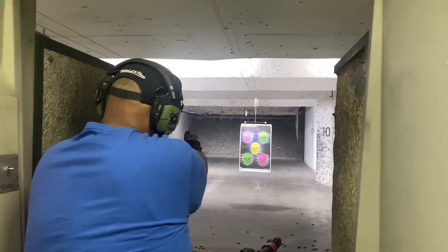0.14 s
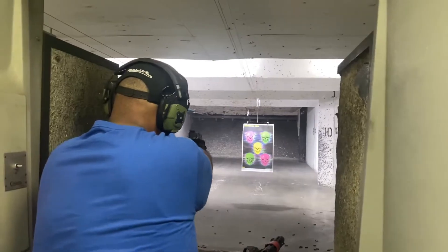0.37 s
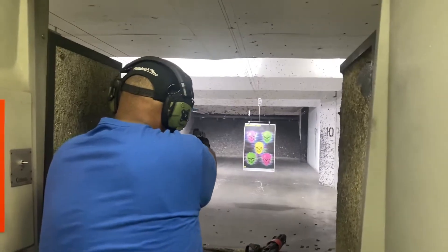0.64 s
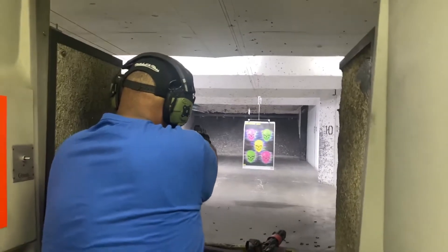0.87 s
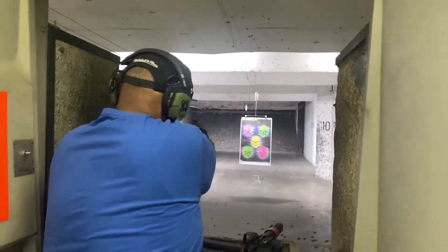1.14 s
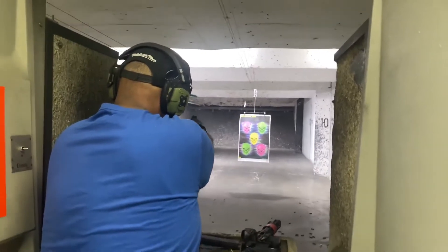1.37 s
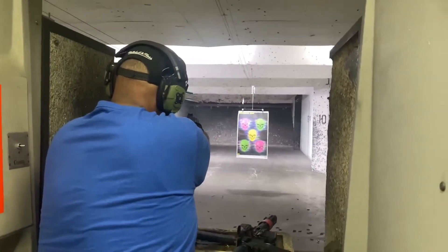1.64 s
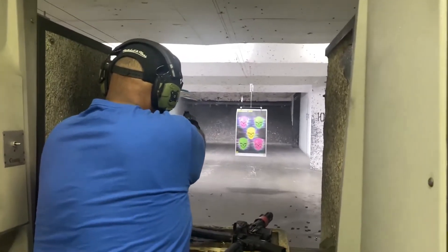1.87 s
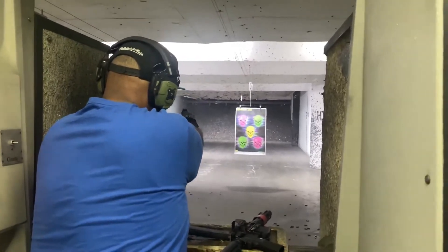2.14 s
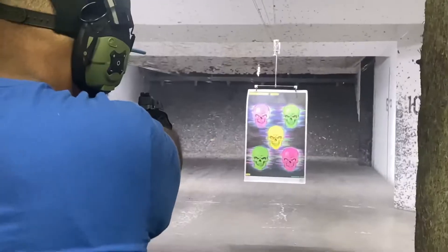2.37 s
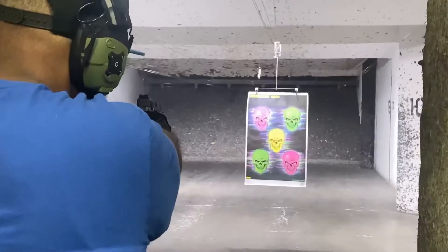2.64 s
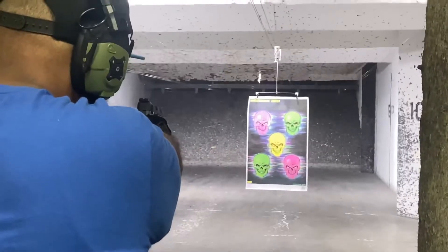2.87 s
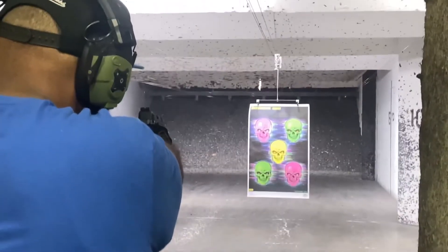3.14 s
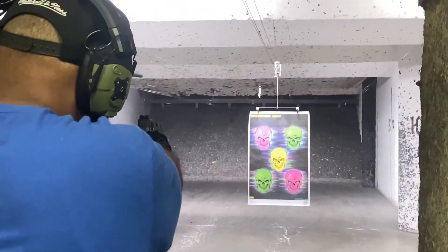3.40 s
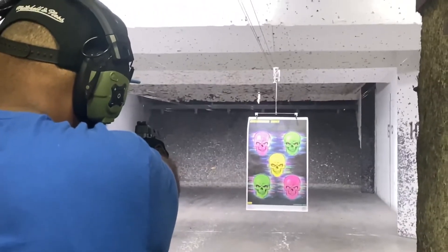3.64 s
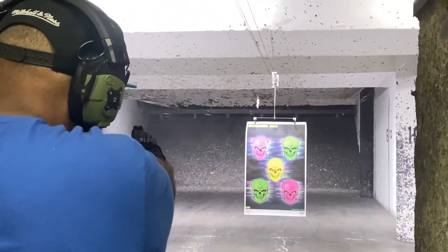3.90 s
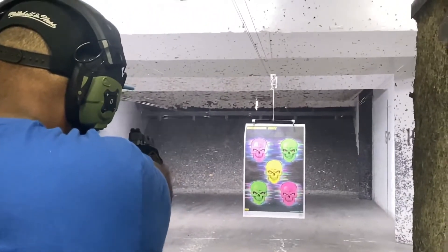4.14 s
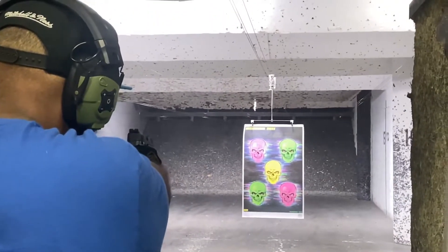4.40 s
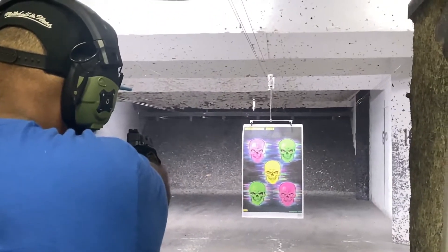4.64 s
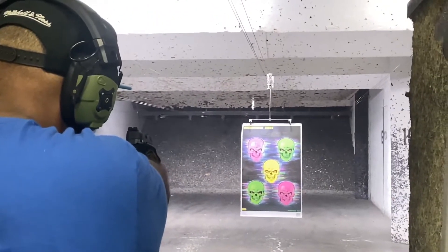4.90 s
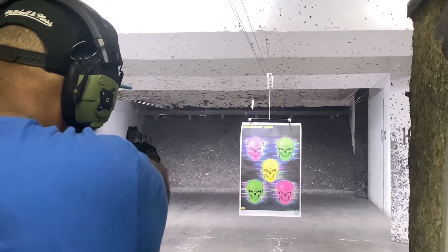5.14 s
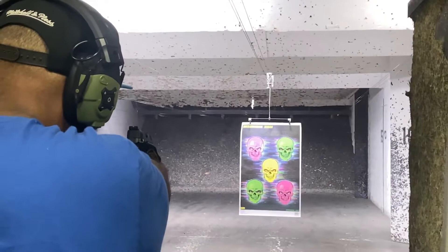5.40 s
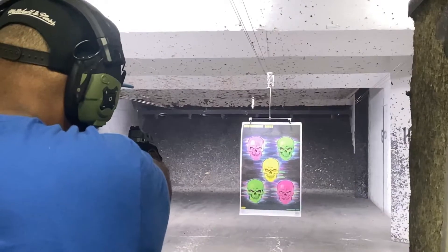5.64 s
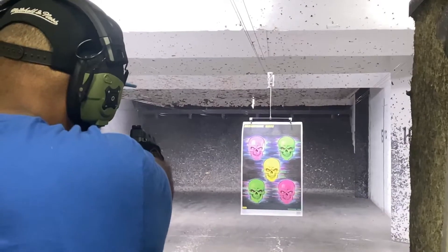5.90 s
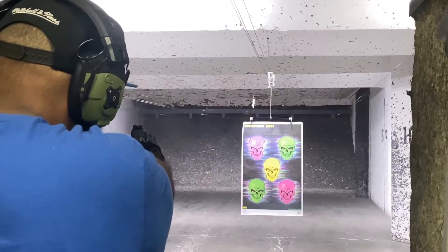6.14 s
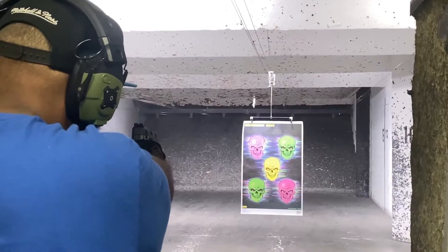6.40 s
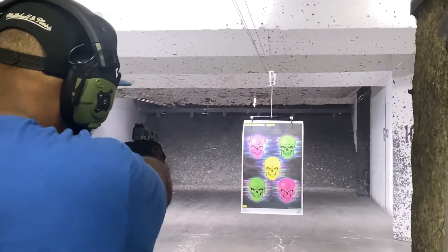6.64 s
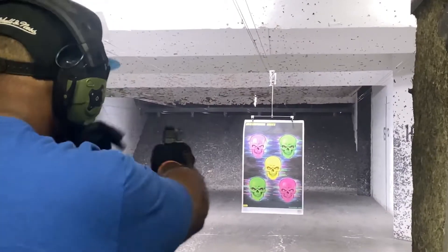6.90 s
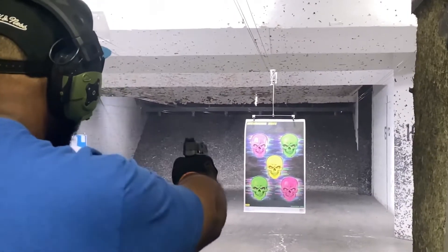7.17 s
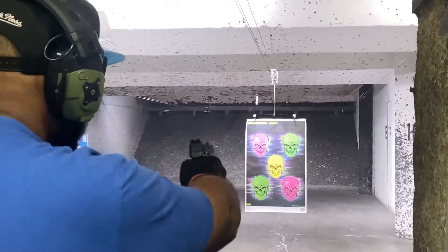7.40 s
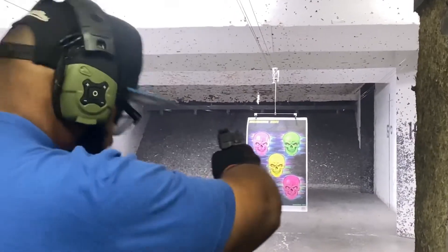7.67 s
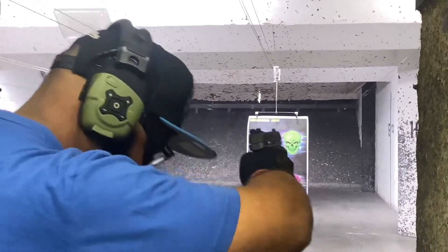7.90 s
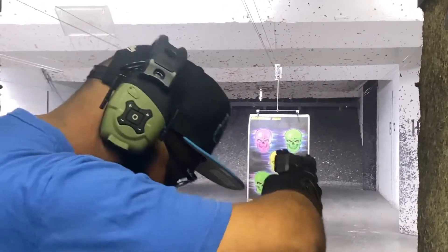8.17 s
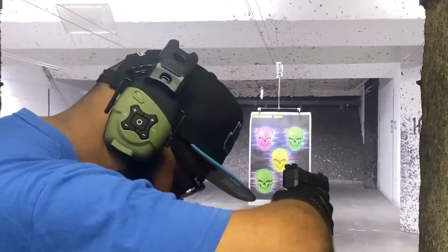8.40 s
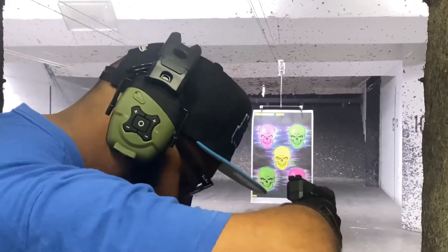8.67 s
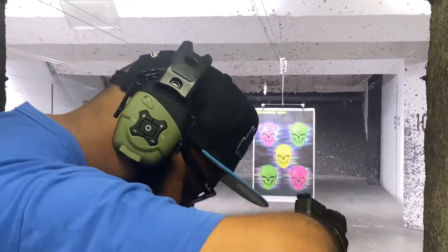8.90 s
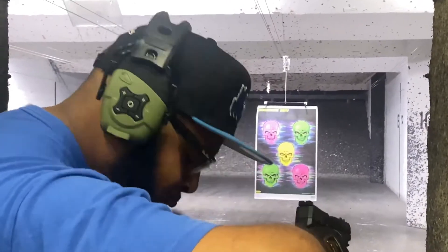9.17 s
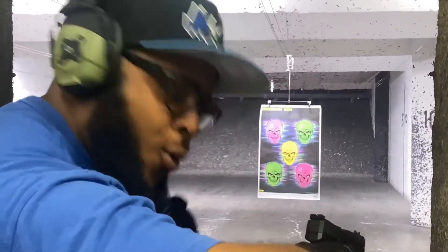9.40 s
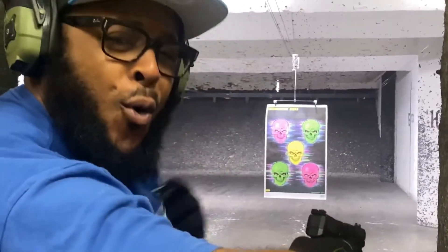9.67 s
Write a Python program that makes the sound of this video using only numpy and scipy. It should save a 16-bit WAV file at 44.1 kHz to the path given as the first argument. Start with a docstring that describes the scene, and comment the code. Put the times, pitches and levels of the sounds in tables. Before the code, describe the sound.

A concrete indoor shooting range with quiet, low ventilation rush, heard from just behind a booth. At 0 s an earlier near shot is still ringing, with a tiny click. A dull far-lane shot rolls in at 0.5 s, then a loud close handgun blast at 1.2 s: bright crack, deep boom, long hall echo. Far shots follow at 1.9 and 3.0 s; around 2.1 s the wide stereo becomes more centred. Near blasts hit at 3.7 and 5.6 s, with sharper attacks, slightly overloaded. Duller far shots sound at 4.35, 5.05, 6.8, 7.95 and 9.0 s. A faint bright hiss sits underneath from 3.3 to 8.1 s, with small metal clicks at 1.65, 2.5 and 4.6 s. A short close hiss comes at 7.9 s. From 8.1 s the bass progressively thins and the ventilation sinks; three light metallic clicks tap at 9.6 to 9.75 s.

```python
"""Indoor shooting range

Three loud shots from a near booth and eight duller ones from a far lane ring down a concrete hall: decaying
noise, with low modes under each shot and a bright crack on the near ones. An earlier near shot still rings at 0 s.
Ventilation is coloured noise, joined in the middle by a steady bright hiss; clicks and one close hiss are noise bursts.
At 2.1 s the microphone pair zooms in, changing the stereo image; near the end a low cut thins the bass."""
import sys
import numpy as np
from scipy import signal
from scipy.fft import rfft, irfft, next_fast_len
from scipy.io import wavfile
from scipy.ndimage import uniform_filter1d

SR = 44100
rng = np.random.default_rng(int(sys.argv[2]) if len(sys.argv) > 2 else 0)


def output_pcm(signal):
    """Save a mono or channel-first signal as 16-bit PCM at the path in sys.argv[1].

    Samples are clipped to [-1, 1] before scaling.
    """
    pcm = np.clip(np.atleast_2d(signal).T, -1, 1) * 32767
    wavfile.write(sys.argv[1], SR, np.round(pcm).astype(np.int16))


def natural_amplitude(level_db):
    """Convert a level in decibels to a linear amplitude factor, elementwise."""
    exponent = np.asarray(level_db, float) / 20
    return 10 ** exponent


N = 431725  # length in samples

# Ventilation rush, relative spectrum: freq_hz [Hz], level_db [dB]
AIR_COLOUR = [(18, -46.5), (30, -17.5), (80, -10), (108, -3), (140, -16), (324, -22), (399, -23),
              (432, -15), (639, -25.5), (709, -15), (1200, -20), (1820, -20.5), (2360, -24.5),
              (2620, -28.5), (9940, -38), (15500, -56.5)]
# Duct tones as narrow noise bands: freq_hz [Hz], width_hz [Hz], level_db [dB, relative]
DUCT_TONES = [(112, 11, -4.5), (300, 12, -23.5), (430, 20, -22.5), (1126.4, 30, -25)]
AIR_DB, AIR_DULL_DB_PER_OCT = -53.5, -7  # level setting; treble slope, mostly above 1 kHz
AIR_LOW_DB, AIR_LOW_HZ = -0.5, 170  # slight shelf on the lows
SINK_FROM_S, SINK_S, SINK_DB = 8.38, 0.22, -6  # the ventilation sinks near the end

# Steady bright hiss, relative spectrum: freq_hz [Hz], level_db [dB]
BRIGHT_COLOUR = [(710, -59), (1200, -25.5), (1420, -18.5), (1600, 1.5), (1930, -2.5), (2260, -19),
                 (2570, -2.5), (4050, -12), (4790, -10.5), (10100, -16), (15000, -28)]
BRIGHT_FROM_S, BRIGHT_TO_S, BRIGHT_EDGE_S, BRIGHT_DB = 3.3, 8.1, 0.15, -61.5

# Metal clicks: start_s [s], level_db [dB], centre_hz [Hz], t60_s [s], left_over_right_db [dB]
CLICKS = [(0.0287, -46, 3630, 0.084, 1.5), (1.6502, -50, 3880, 0.046, -4), (2.5381, -47, 10080, 0.095, -3),
          (4.6434, -40, 3120, 0.07, 0.0), (9.5855, -35, 3950, 0.11, 3.5), (9.6425, -43, 5220, 0.083, -3),
          (9.7489, -42.5, 3010, 0.13, 3.5)]
# Short close hiss, relative spectrum: freq_hz [Hz], level_db [dB]
HISS_COLOUR = [(470, -26), (800, -14), (1660, -4.5), (2130, -7), (7100, -7), (8550, -3), (10200, -4),
               (11900, -12), (15500, -20.5)]
HISS_S, HISS_DB, HISS_RISE_S, HISS_HOLD_S, HISS_T60_S = 7.893, -41, 0.0093, 0.047, 0.42

# Far-lane shots: start_s [s], level_db [dB], hold_s [s before the roar decays]
FAR_SHOTS = [(0.533, -18, 0.14), (1.894, -17, 0.024), (2.963, -17, .02), (4.351, -16.5, .03),
             (5.047, -16.5, 0.033), (6.812, -17, 0.022), (7.953, -16.5, 0.028), (8.969, -17, 0.033)]
# Far roar, relative spectrum: freq_hz [Hz], level_db [dB]
FAR_COLOUR = [(24, -47.5), (45, -24), (85, -13), (136, -2.5), (230, -14.5), (330, -8), (450, -1), (760, -4),
              (1100, -7), (1450, -16.5), (2000, -12.5), (2700, -17.5), (3500, -23), (7300, -29),
              (10500, -32), (12200, -44), (15500, -50)]
# Hall decay heard from the far lane: freq_hz [Hz], t60_s [s]
LANE_T60 = [(50, 0.9), (150, 0.9), (400, 1.046), (1000, 1.04), (2500, 1.05), (5000, 1.035), (8000, 0.74),
            (14000, 0.82)]
# Bunched far returns from the end walls: delay_s [s], lift_db [dB], spread_s [s]
FAR_RETURNS = [(.001, -1.5, .012), (0.021, -1, 0.0072), (0.064, -1.5, .015), (.12, 1.5, 0.14)]
# Low hall modes pushed by a far shot: pitch_hz [Hz], level_db [dB re the roar], t60_s [s]
LANE_THUMP = [(127.3, -13.5, 0.37), (152, -16.5, .35)]
FAR_RISE_MS, FAR_BRIGHT_DB_PER_OCT = 5.5, 0.075

# Near-booth shots: start_s [s], level_db [dB], rise_ms [ms], bright [dB per octave], boom_db [dB]
NEAR_SHOTS = [(1.2126, -3, 7.5, 0.07, -5), (3.7321, -3.5, 2.2, 0.15, 0), (5.6322, -3.5, 2.2, 0.25, -1.5)]
# Near roar, relative spectrum: freq_hz [Hz], level_db [dB]
NEAR_COLOUR = [(24, -46), (45, -14), (80, -5.5), (150, -10), (220, -12), (400, -9), (800, -13),
               (1400, -16.5), (2300, -18.5), (4000, -21), (7500, -28), (10400, -25.5), (12200, -36),
               (15500, -40)]
# Booth decay: freq_hz [Hz], t60_s [s]
BOOTH_T60 = [(50, 0.55), (300, 0.37), (1500, 0.35), (6000, 0.29), (14000, 0.14)]
# Hall decay behind the booth: freq_hz [Hz], t60_s [s]
HALL_T60 = [(50, .6), (150, 1.1), (400, 1.44), (1000, 1.664), (2500, 1.283), (5000, 1.07), (8000, 0.83),
            (14000, 0.54)]
# Hall level against the booth: freq_hz [Hz], level_db [dB]
HALL_UNDER_BOOTH = [(60, -24.5), (200, -12), (600, -5.5), (1200, -3.5), (3000, -3), (12000, -4.5)]
# Bunched near returns from the end walls: delay_s [s], lift_db [dB], spread_s [s]
NEAR_RETURNS = [(.012, 1, .015), (.044, -0.5, 0.008), (.062, 1, .012), (.1, 4, .04), (.2, -2.5, 0.05),
                (.3, 0.5, 0.051)]
# Low booth modes: pitch_hz [Hz], level_db [dB, before each shot's boom_db], t60_s [s]
BOOM_MODES = [(48, -14.5, 0.54), (76.4, -3, 0.27), (93.8, -6.5, 0.28), (144.6, -4, 0.15)]
# Hall modes that outlast the roar: pitch_hz [Hz], level_db [dB re the roar], t60_s [s]
RING_MODES = [(326.5, -38.5, 2.8), (437, -39.5, 2.2), (505, -38, 0.84), (695, -40, 1.9), (917, -41.5, 2.1),
              (1020, -40, 2.8), (1118, -37.5, 1.9), (1300, -42, 1.4)]
NEAR_HOLD_S = 0.0064  # the roar holds before it decays
EARLIER_AGO_S = 0.83  # one more shot like the first, its tail still ringing at the start
CRACK_DB, CRACK_PEAK_S, CRACK_LOW_HZ, CRACK_TOP_HZ = -3.5, 0.00074, 3500, 11000  # muzzle crack

# Likeness of two shots from one place: freq_hz [Hz], likeness [0 to 1]
REPEAT = [(100, .95), (700, 0.79), (2500, .55), (7000, .25)]
SLAPS_PER_S, SLAP_SHARE, SLAP_TOP_HZ = 220, 0.39, 1480  # single dull wall echoes in the roar

# Wide pair, left-right likeness: freq_hz [Hz], likeness [0 to 1]
WIDE_SAME = [(60, 0.85), (200, 0.28), (600, 0.4), (1500, 0.12), (4000, 0.13), (12000, 0.086)]
# Wide pair, balance: freq_hz [Hz], left_over_right_db [dB]
WIDE_BALANCE = [(60, -2.5), (180, -4.5), (550, -3.5), (1650, -3), (4970, -1), (15000, -1)]
# Wide pair, tone: freq_hz [Hz], level_db [dB]
WIDE_COLOUR = [(60, -3), (250, -1.8), (600, -2), (900, 1), (1400, 3.5), (2200, 0), (4000, 2.5), (9000, 0),
               (13000, 3)]
# Zoomed pair, left-right likeness: freq_hz [Hz], likeness [0 to 1, below 0 counts as 0]
ZOOM_SAME = [(60, 0.93), (110, 0.99), (200, 0.85), (380, 0.95), (700, 0.67), (1290, 0.22), (2380, 0.92),
             (4400, 1), (8120, 0.97), (15000, -0.55)]
# Zoomed pair, balance: freq_hz [Hz], left_over_right_db [dB]
ZOOM_BALANCE = [(60, 1.5), (180, 0.31), (550, -0.5), (1650, -0.87), (4970, 0.0), (15000, 0.0)]
ZOOM_S, WIDE_LAG_S = 2.1, 0.00036

# Band that sounds weak from 2.1 s on: freq_hz [Hz], width_hz [Hz], level_db [dB]
LATER_WEAK_BAND = (8500, 380, -14.5)
# Band that sounds weak throughout: freq_hz [Hz], width_hz [Hz], level_db [dB]
WEAK_BAND = (12050, 330, -22)
MIC_LOW_HZ, MIC_TOP_HZ = 38, 15300
LOW_CUT_FROM_S, LOW_CUT_S = 8.1, 1.13
LOW_CUT_START_HZ, LOW_CUT_END_HZ, LOW_CUT_SLOPE = 37, 940, 1.7


def read(points, hz):
    """Reads a spectrum table at the frequencies hz, along a log frequency axis."""
    f, value = np.transpose(points)
    return np.interp(np.log(hz + 1), np.log(f + 1), value)


def ramp(t, start, length):
    """Goes from 0 to 1 in a straight line."""
    return np.clip((t - start) / max(length, 0.001), 0, 1)


def add(mix, start_s, sound):
    """Mixes in a two-channel sound, which may begin before time zero."""
    at = round(start_s * SR)
    sound = sound[:, max(-at, 0):]
    part = mix[:, max(at, 0):][:, :sound.shape[1]]
    part += sound[:, :part.shape[1]]


def spectrum_grid(seconds, size):
    """Bin frequencies (column) and frame times (row) of a short-time spectrum."""
    hz = np.fft.rfftfreq(size, 1 / SR)[:, None]
    t = np.arange(int(seconds * SR * 4 / size) + 1) * size / 4 / SR
    return hz, t


def noise_fields(hz, t):
    """Two unrelated complex noise fields over frequency and time."""
    re, im = rng.standard_normal((2, 2, len(hz), len(t)))
    return re + 1j * im


def blend(a, b, same):
    """Mixes a and b at constant power, so the result is like a by the share same."""
    same = np.clip(same, 0, 1)
    return same * a + np.sqrt(1 - same ** 2) * b


def patches(hz, t, bins, frames):
    """Smooth random bumps over frequency and time, with a spread of 1."""
    bumps = rng.standard_normal((len(hz), len(t)))
    bumps = uniform_filter1d(bumps, bins, 0)
    bumps = uniform_filter1d(bumps, frames, 1)
    return bumps / bumps.std()


def microphone_pair(fields, hz, wide):
    """Turns two fields into left and right; the wide pair hears the right late, the zoomed one hears both together."""
    same = np.where(wide, read(WIDE_SAME, hz), read(ZOOM_SAME, hz))
    tilt_db = np.where(wide, read(WIDE_BALANCE, hz), read(ZOOM_BALANCE, hz)) / 2
    fields = fields * natural_amplitude(np.where(wide, read(WIDE_COLOUR, hz), 0))
    late = np.exp(-2j * np.pi * hz * WIDE_LAG_S * wide)
    left = fields[0] * natural_amplitude(tilt_db)
    right = blend(fields[0], fields[1], same) * late * natural_amplitude(-tilt_db)
    size = 2 * len(hz) - 2
    return signal.istft(np.array([left, right]), nperseg=size, noverlap=size * 3 // 4)[1]


def later_weak_band(fields, hz, early):
    """From 2.1 s on, one band of the treble sounds weak."""
    centre_hz, width_hz, level_db = LATER_WEAK_BAND
    weak_db = level_db * np.exp(-((hz - centre_hz) / width_hz) ** 2)
    return fields * natural_amplitude(np.where(early, 0, weak_db))


def to_stereo(fields, hz, early):
    """Left and right of a sound, heard by the wide pair early on and by the zoomed pair later."""
    return microphone_pair(later_weak_band(fields, hz, early), hz, early)


def ventilation():
    """Air rush with faint slow patches and wavering duct tones, plus a bright hiss that comes and goes."""
    hz, t = spectrum_grid(N / SR + 0.089, size=2048)
    drift_db = patches(hz, t, bins=20, frames=8)
    rush = natural_amplitude(read(AIR_COLOUR, hz))
    rush = rush / np.linalg.norm(rush)
    rush = rush * natural_amplitude(drift_db + AIR_DULL_DB_PER_OCT * np.log2(hz / 1000 + 1))
    tones = sum(natural_amplitude(level_db) * np.exp(-((hz - f) / width_hz) ** 2) for f, width_hz, level_db in DUCT_TONES)
    low_shelf = natural_amplitude(AIR_LOW_DB / (1 + (hz / AIR_LOW_HZ) ** 2))
    air = np.hypot(rush, tones) * low_shelf * natural_amplitude(AIR_DB + SINK_DB * ramp(t, SINK_FROM_S, SINK_S))
    bright = natural_amplitude(read(BRIGHT_COLOUR, hz))
    bright = bright / np.linalg.norm(bright)
    on = ramp(t, BRIGHT_FROM_S, BRIGHT_EDGE_S) - ramp(t, BRIGHT_TO_S, BRIGHT_EDGE_S)
    bright = bright * natural_amplitude(BRIGHT_DB + drift_db) * on
    fields = noise_fields(hz, t) * np.hypot(air, bright)
    return to_stereo(fields, hz, t < ZOOM_S)[:, :N]


def clicks():
    """Small metal taps: band-passed noise with a sharp tick and a brief bright rattle."""
    out = np.zeros((2, N))
    t = np.arange(SR // 8) / SR
    for start_s, level_db, centre_hz, t60_s, pan_db in CLICKS:
        envelope = np.exp(-t / 0.00097) + 0.22 * natural_amplitude(-60 * t / t60_s)
        rattle = rng.standard_normal(len(t)) * envelope
        band_hz = [max(0.39 * centre_hz, 500), min(2.7 * centre_hz, 18000)]
        tap = signal.lfilter(*signal.butter(1, band_hz, "bandpass", fs=SR), rattle)
        side_db = np.array([[pan_db], [-pan_db]]) / 2
        add(out, start_s, natural_amplitude(level_db + side_db) * tap / abs(tap).max())
    return out


def close_hiss():
    """A short bright noise burst close to the microphone: quick rise, hold, decay."""
    hz, t = spectrum_grid(0.5, size=256)
    sound = to_stereo(noise_fields(hz, t) * natural_amplitude(read(HISS_COLOUR, hz)), hz, False)
    since = np.arange(sound.shape[1]) / SR
    rise = ramp(since, 0, HISS_RISE_S) ** 2
    fall_db = -60 * np.maximum(since - HISS_RISE_S - HISS_HOLD_S, 0) / HISS_T60_S
    out = np.zeros((2, N))
    add(out, HISS_S, rise * natural_amplitude(HISS_DB + fall_db) * sound / sound.std())
    return out


def echoes(hz, t):
    """The echo pattern of one place: dense roar plus sparse single slaps."""
    size = 2 * len(hz) - 2
    where, height = rng.random((2, 2, len(t) * size // 4))
    slaps = (where < SLAPS_PER_S / SR) * (2 * height - 1)
    slaps = signal.stft(slaps, nperseg=size, noverlap=size * 3 // 4)[2][:, :, :len(t)]
    slaps = np.sqrt(2) * slaps / slaps.std()
    return blend(slaps, noise_fields(hz, t), SLAP_SHARE / (1 + (hz / SLAP_TOP_HZ) ** 2))


def bunching_db(returns, t):
    """How far the bunched wall returns raise or lower the tail at time t."""
    return sum(lift_db * np.exp(-((t - delay_s) / spread_s) ** 2) for delay_s, lift_db, spread_s in returns)


def shots(rows, colour, returns, tail_of, body):
    """The blast fills the hall; one place gives nearly the same lumpy echoes each time."""
    out = np.zeros((2, N))
    hz, t = spectrum_grid(1.9, size=512)
    shape = natural_amplitude(read(colour, hz) + bunching_db(returns, t))
    lumps_db = 1.5 * patches(hz, t, bins=2, frames=30)
    # one echo pattern before the zoom and another after it
    pattern = {True: echoes(hz, t), False: echoes(hz, t)}
    for start_s, level_db, hold_s, rise_ms, bright, *boom_db in rows:
        early = start_s < ZOOM_S
        fields = blend(pattern[early], noise_fields(hz, t), read(REPEAT, hz))
        tail = shape * tail_of(hz, np.maximum(t - hold_s, 0))
        tint_db = lumps_db + bright * np.log2(hz / 1000 + 0.05)
        roar = to_stereo(fields * tail * natural_amplitude(tint_db), hz, early)
        roar = roar / np.percentile(abs(roar[:, :SR // 10]), 99.3)  # near-peak of the first 0.1 s
        since = np.arange(roar.shape[1]) / SR
        roar = roar * (1 - np.exp(-(1000 * since / rise_ms) ** 2))
        sound = roar + body(since, rise_ms, *boom_db)
        add(out, start_s - rise_ms / 2000, natural_amplitude(level_db) * sound)
    return out


def lane_tail(hz, t):
    """From afar only the hall decay is heard."""
    return natural_amplitude(-60 * t / read(LANE_T60, hz))


def thump(t, _rise_ms):
    """A far shot swells briefly in the low modes of the hall, as decaying sines."""
    modes = sum(natural_amplitude(level_db - 60 * t / t60_s) * np.sin(2 * np.pi * pitch_hz * t)
                for pitch_hz, level_db, t60_s in LANE_THUMP)
    return modes * (1 - np.exp(-(t / 0.025) ** 2))


def far_shots():
    """Dull shots from the far lane: the hall's roar over a low thump."""
    rows = [(*row, FAR_RISE_MS, FAR_BRIGHT_DB_PER_OCT) for row in FAR_SHOTS]
    return shots(rows, FAR_COLOUR, FAR_RETURNS, lane_tail, thump)


def booth_tail(hz, t):
    """The booth rings first and louder, the hall stays behind."""
    booth = natural_amplitude(-60 * t / read(BOOTH_T60, hz))
    hall = natural_amplitude(read(HALL_UNDER_BOOTH, hz) - 60 * t / read(HALL_T60, hz))
    return np.hypot(booth, hall)


def boom(t):
    """The blast pushes the low booth modes, which swell slowly and reach the two ports a little apart."""
    turn = np.array([[0.28], [-0.28]])  # phase at left and right, radians
    modes = sum(natural_amplitude(level_db - 60 * t / t60_s) * np.sin(2 * np.pi * pitch_hz * t + (-1) ** k * turn)
                for k, (pitch_hz, level_db, t60_s) in enumerate(BOOM_MODES))
    return modes * (1 - np.exp(-(t / 0.014) ** 2))


def ring(t):
    """Long-lived hall modes build up behind the blast, each with its own phase at each port."""
    turns = rng.random((len(RING_MODES), 2, 1)) * [[1], [0.3]]
    phase = 2 * np.pi * np.cumsum(turns, axis=1)  # left and right differ by up to 0.3 cycle
    modes = sum(natural_amplitude(level_db - 60 * t / t60_s) * np.sin(2 * np.pi * pitch_hz * t + p)
                for (pitch_hz, level_db, t60_s), p in zip(RING_MODES, phase))
    return modes * (1 - np.exp(-t / 0.12))


def crack(t):
    """A bright noise burst of a few milliseconds, nearly alike at both ports."""
    u = np.maximum(t, 0) / CRACK_PEAK_S
    a, b = rng.standard_normal((2, len(t))) * u * np.exp(1 - u)
    band = signal.butter(1, [CRACK_LOW_HZ, CRACK_TOP_HZ], "bandpass", fs=SR)
    return natural_amplitude(CRACK_DB) * signal.lfilter(*band, [a, blend(a, b, 0.74)])


def near_body(t, rise_ms, boom_db):
    """What a near blast adds to its roar: booth boom with wall returns, hall ring and muzzle crack."""
    booth_boom = natural_amplitude(boom_db + bunching_db(NEAR_RETURNS, t)) * boom(t)
    return booth_boom + ring(t) + crack(t - rise_ms / 2000)


def near_shots():
    """Loud shots from the near booth, led by the earlier one whose tail crosses time zero."""
    earlier = (-EARLIER_AGO_S, *NEAR_SHOTS[0][1:])
    rows = [(start_s, level_db, NEAR_HOLD_S, *rest) for start_s, level_db, *rest in [earlier, *NEAR_SHOTS]]
    return shots(rows, NEAR_COLOUR, NEAR_RETURNS, booth_tail, near_body)


def scene():
    """All sources at the microphones."""
    return ventilation() + clicks() + close_hiss() + far_shots() + near_shots()


def low_cut(x):
    """Near the end a high-pass slides upward and thins the bass."""
    hz, t, z = signal.stft(x, SR, nperseg=2048, noverlap=1536)
    edge_hz = LOW_CUT_START_HZ * (LOW_CUT_END_HZ / LOW_CUT_START_HZ) ** ramp(t, LOW_CUT_FROM_S, LOW_CUT_S)
    cut = (t > LOW_CUT_FROM_S) * (edge_hz / (hz[:, None] + 1)) ** LOW_CUT_SLOPE
    return signal.istft(z / np.sqrt(1 + cut), SR, nperseg=2048, noverlap=1536)[1][:, :N]


def treble_shape(x):
    """Rolls off the extreme treble; one band under it sounds weak."""
    size = next_fast_len(N)
    hz = np.fft.rfftfreq(size, 1 / SR)
    edge_db = -0.03 * np.maximum(hz - MIC_TOP_HZ, 0)
    centre_hz, width_hz, level_db = WEAK_BAND
    weak_db = level_db * np.exp(-((hz - centre_hz) / width_hz) ** 4)
    return irfft(rfft(x, size) * natural_amplitude(edge_db + weak_db), size)[:, :N]


def band_limit(x):
    """A steep low-pass at the top of the band."""
    return signal.sosfilt(signal.butter(12, 16490, fs=SR, output="sos"), x)


def record(dry):
    """Sliding low cut, soft overload, low band edge, then the shape of the treble."""
    thinned = low_cut(dry)
    overloaded = 1.123 * np.tanh(thinned / 1.087)
    low_edged = signal.lfilter(*signal.butter(2, MIC_LOW_HZ, "highpass", fs=SR), overloaded)
    mix = treble_shape(low_edged)
    return band_limit(mix)


dry = scene()
out = record(dry)
output_pcm(out)
```